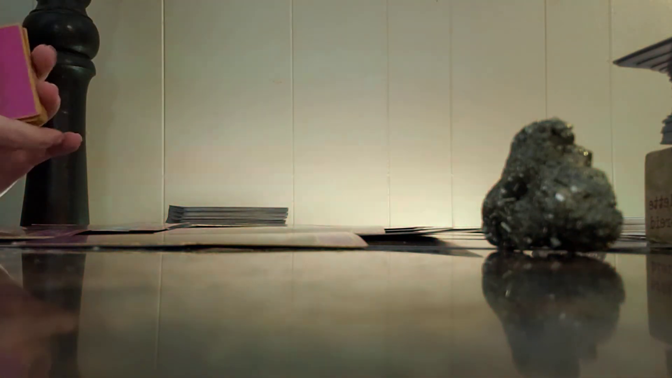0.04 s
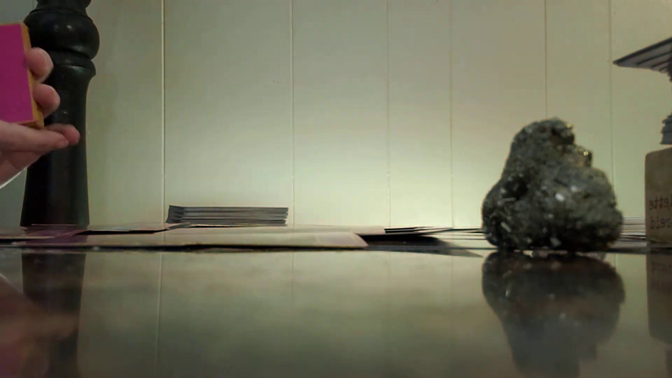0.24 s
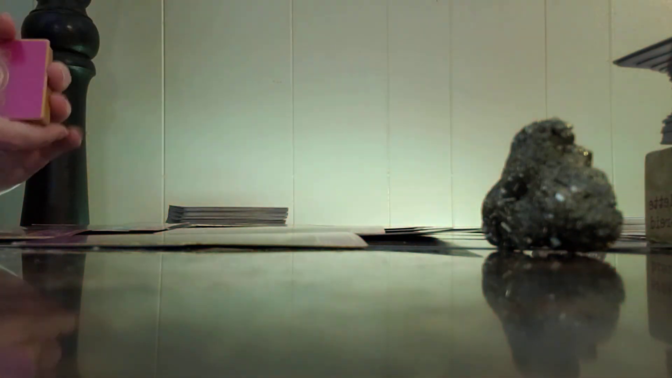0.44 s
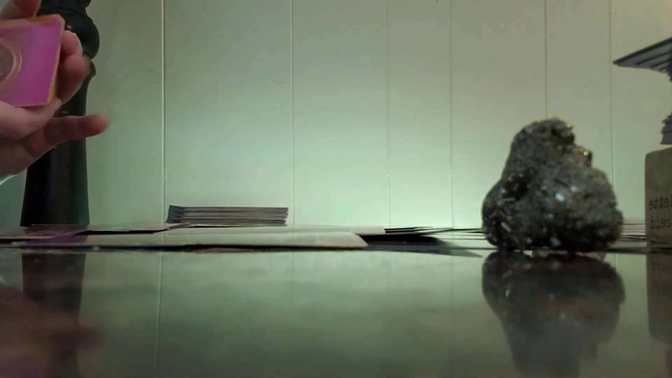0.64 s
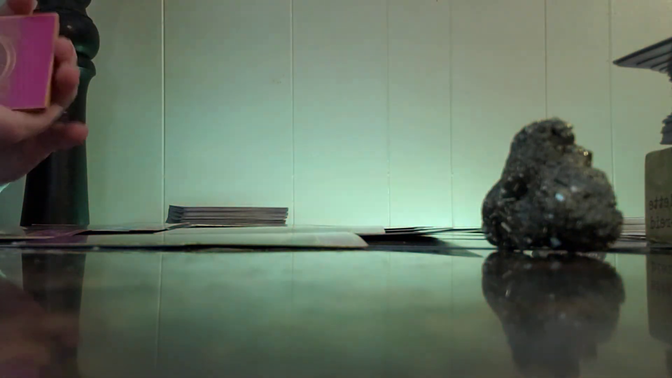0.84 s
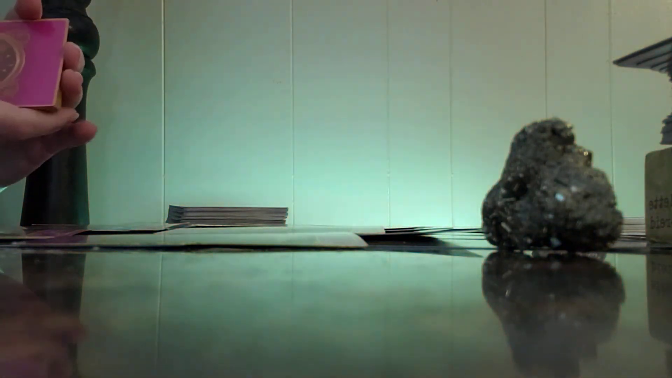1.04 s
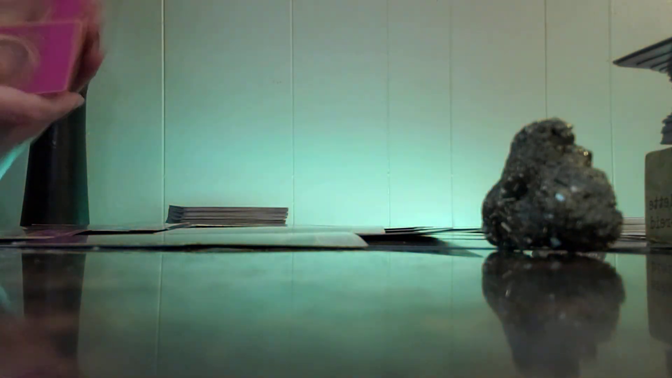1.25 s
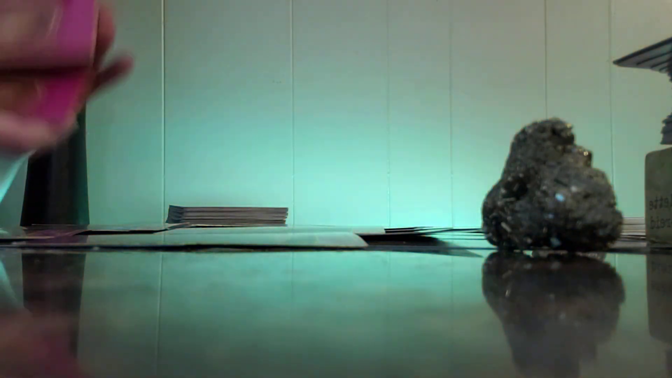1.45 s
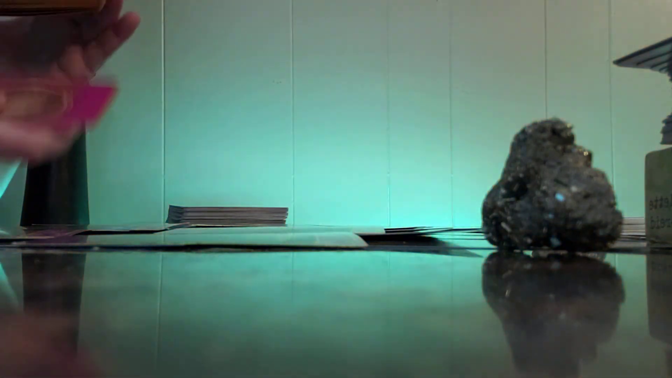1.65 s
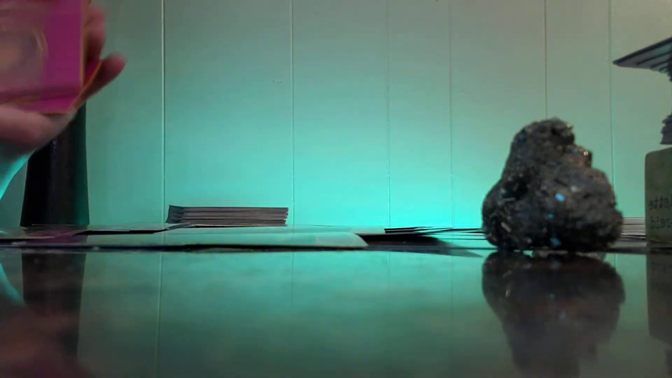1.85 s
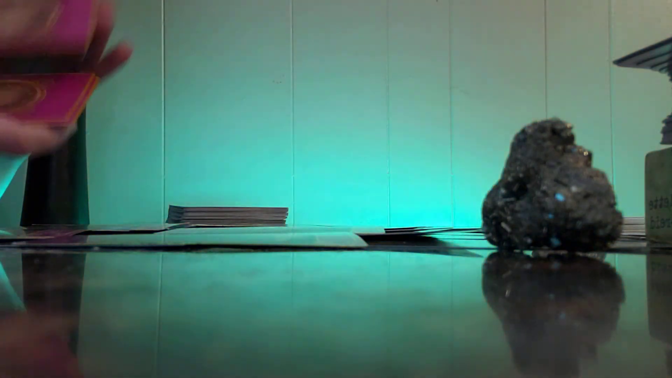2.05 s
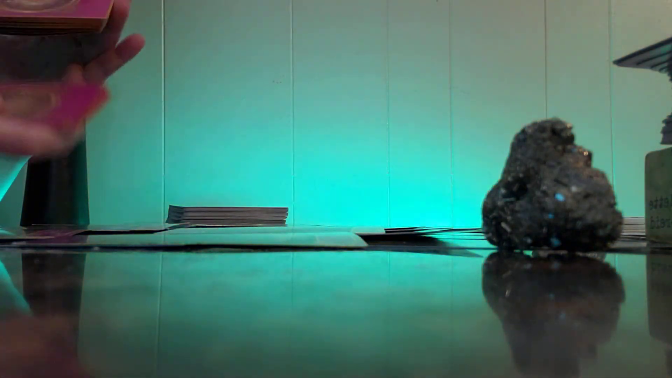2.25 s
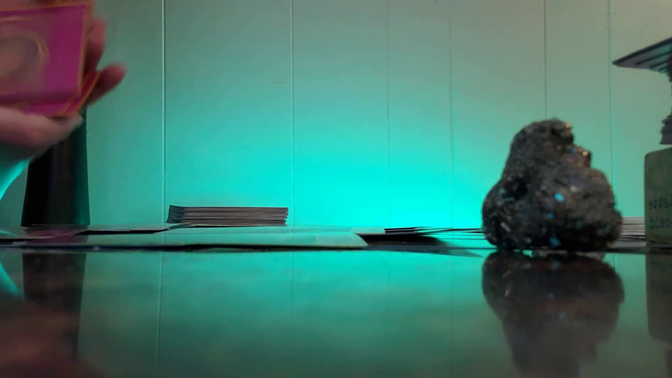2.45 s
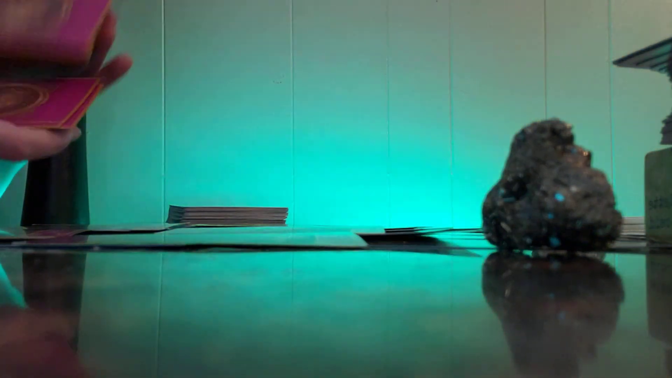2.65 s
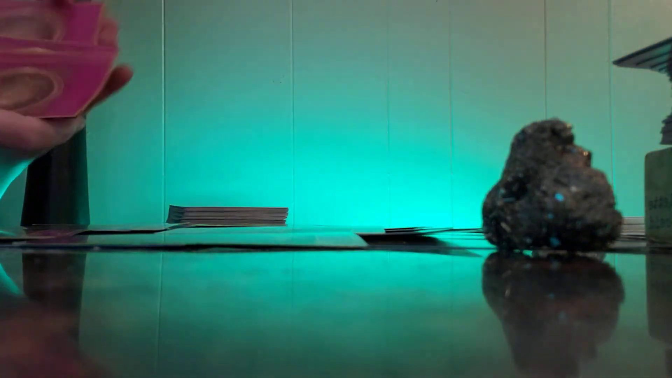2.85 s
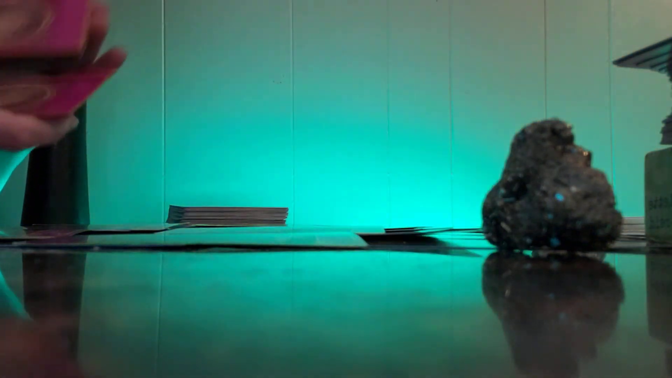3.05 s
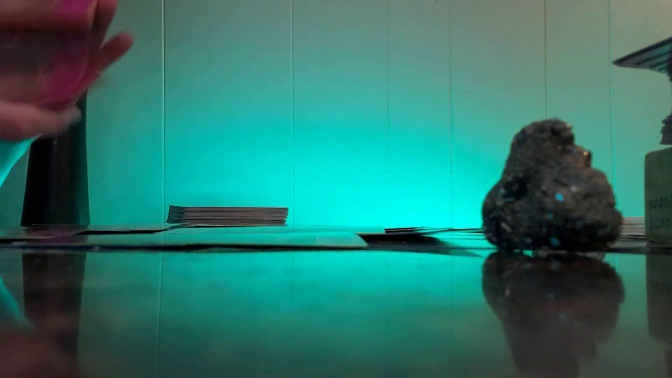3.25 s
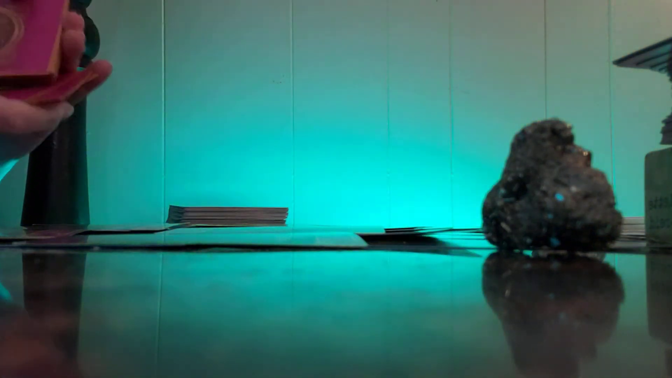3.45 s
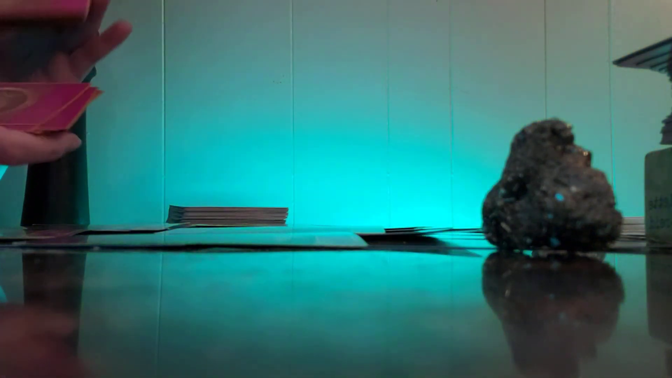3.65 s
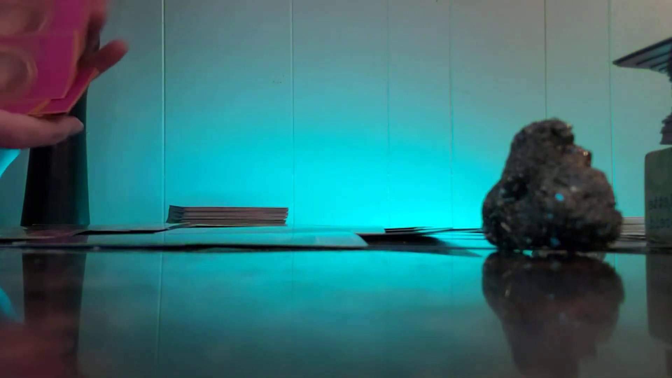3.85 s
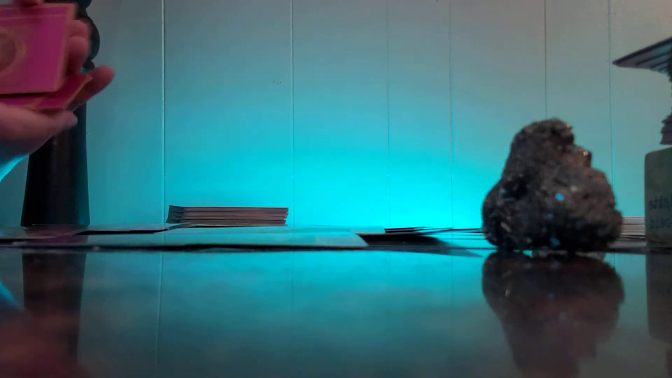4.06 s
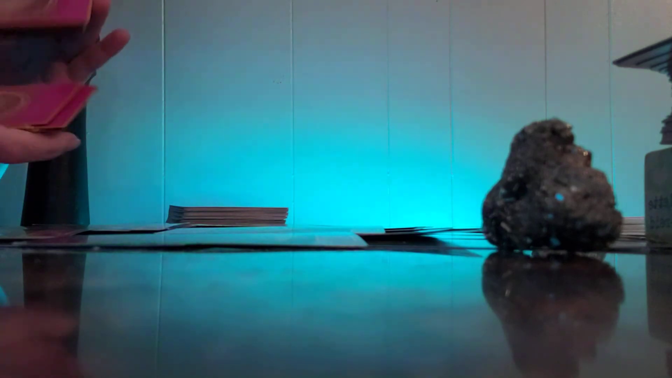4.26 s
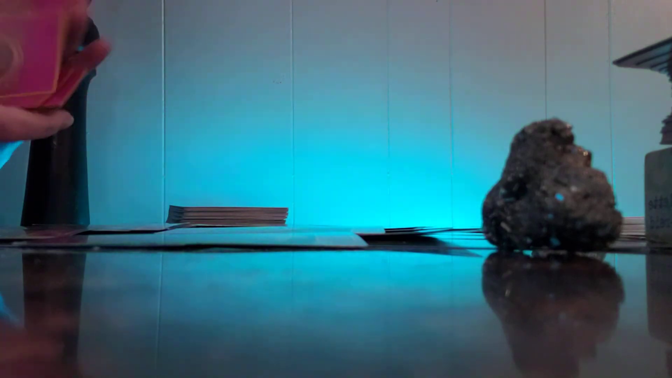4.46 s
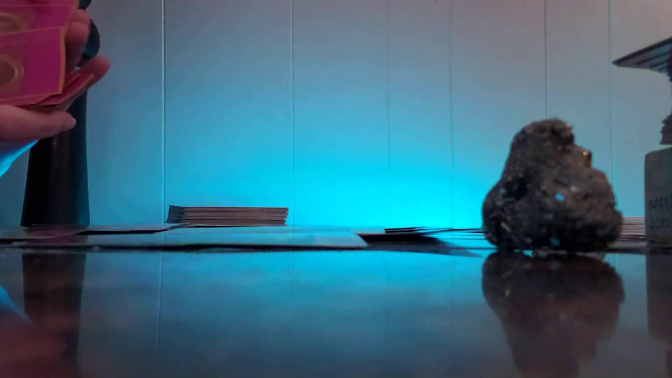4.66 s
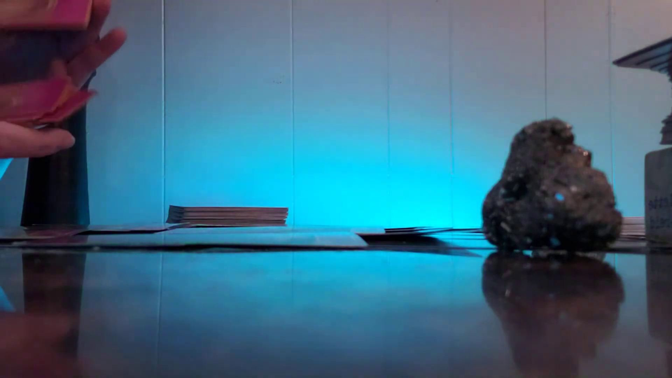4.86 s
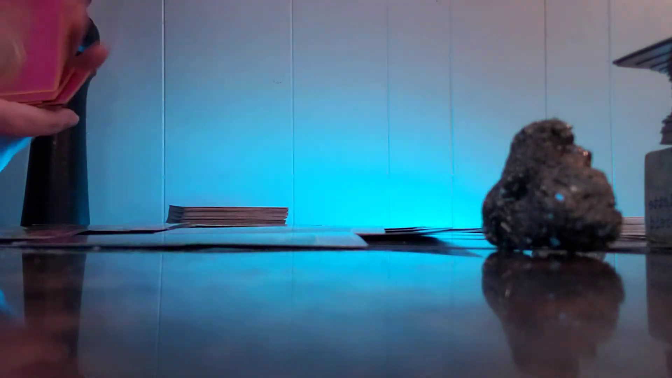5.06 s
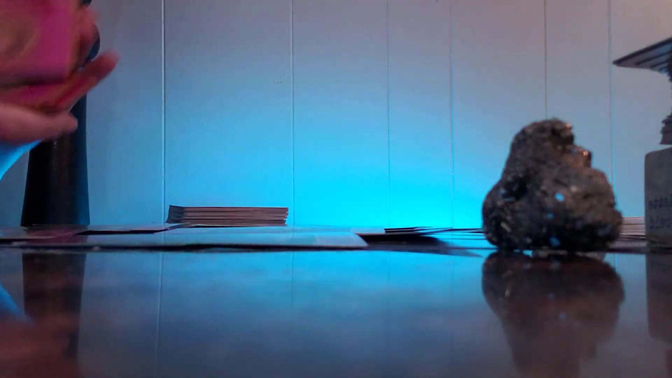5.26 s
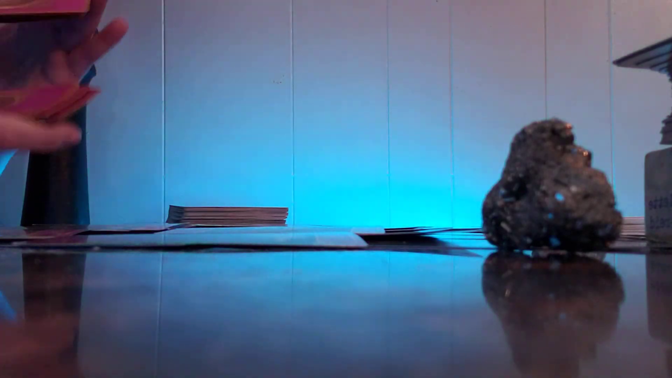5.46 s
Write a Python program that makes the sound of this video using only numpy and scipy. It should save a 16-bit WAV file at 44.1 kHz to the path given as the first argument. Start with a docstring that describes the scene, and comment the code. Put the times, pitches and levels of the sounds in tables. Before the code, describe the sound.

Overhand shuffling of a thick card deck, heard close and a little left of centre indoors. Just over a second of quiet rumble comes first, then ten regular slaps, a brief gap filled with sliding and light ticks, and three more slaps. Each has a brief hiss, bright snap, woody clack and hollow knock, followed by a short, hard room reverberation.

```python
"""A low rumble, a deep drone, faint hiss and a thin whine come first; then fingers scrape on card.
A deck of tarot cards is shuffled overhand, about three strokes a second, a little left of the microphones.
In each stroke a packet hisses over the deck, its edges snap, and it lands with a slap that squeezes out the air.
The hand answers with a soft thump and a knock of cupped air, and cards tick as the next packet is gripped.
Rubbing is shaped noise, contacts are coloured bursts, slaps are air pulses ringing the deck; a hard room replies."""
import sys
import numpy as np
from scipy import signal
from scipy.fft import rfft, irfft, next_fast_len
from scipy.io import wavfile
from scipy.ndimage import map_coordinates

SR = 44100
rng = np.random.default_rng(int(sys.argv[2]) if len(sys.argv) > 2 else 0)


def digitize_waveform(pressure):
    """Quantize a signal to 16-bit integers and store it at the path in sys.argv[1].

    Rows of a 2-D input are taken as channels; values are limited to [-1, 1].
    """
    field = np.atleast_2d(pressure).T
    bounded = np.clip(field, -1, 1)
    quanta = np.round(bounded * 32767).astype(np.int16)
    wavfile.write(sys.argv[1], SR, quanta)


N = 243431
TIME = np.arange(N) / SR

# Overhand strokes: the packet is drawn off, slides, lands on one edge, then falls flat into the palm.
# Each row: landing in seconds, slide length in seconds, fall time in seconds, then relative levels in dB of
# the draw, slide, landing push, landing clack and flat push, flat push length in milliseconds, flat snap in dB,
# flat clack in dB, card bending pitch in Hz, thump in dB, cupped air pitch in Hz, knock in dB.
STROKES = [ (1.3441, .020, .0045, -56, -29, -12, -26, -32, 0.7, -26.5, -17, 2320, -24, 732, -12.5),
           (1.6767, 0.023, 0.0071, -45, -28, -18.5, -25.5, -19.5, 1.54, -28, -32, 1680, -32, 1030, -24.5),
           (1.984, 0.024, 0.007, -49, -29.5, -21, -34, -29, 1.7, -19.5, -29.5, 2650, -34.5, 1100, -26.5),
           (2.294, 0.029, 0.0088, -53, -32.5, -28.5, -39, -26, 1.33, -22.5, -28, 990, -37, 880, -31),
           (2.6134, .028, 0.0041, -52, -28, -24, -27, -18, 0.5, -32, -19, 2380, -28.5, 1175, -20),
           (2.9861, 0.032, 0.0049, -49.5, -31, -21.5, -24, -26, 1.55, -36, -44, 2410, -34, 1140, -19),
           (3.3203, 0.039, 0.007, -55, -33.5, -20.5, -29.5, -26.5, 1.55, -32, -29.5, 1380, -27.5, 1470, -26),
           (3.6376, 0.022, 0.0086, -52, -31.5, -20.5, -40, -24.5, 1.16, -22, -26, 1280, -28.5, 1396, -21),
           (3.9552, .021, .0068, -47.5, -33, -11.5, -34, -30.5, 2.6, -39, -28, 1110, -24, 1070, -36),
           (4.2497, 0.015, .0060, -39, -30.5, -23.5, -28.5, -25, 0.54, -40, -49, 2860, -38, 840, -28),
           (4.8307, 0.042, .0038, -53.5, -32.5, -18.5, -24.5, -21.5, 0.77, -42, -33, 990, -30, 760, -21),
           (5.1794, .035, 0.0053, -43.5, -38.5, -27, -33, -14, 0.51, -29.5, -22, 2350, -23.5, 1090, -21),
           (5.483, 0.021, 0.0035, -46.5, -45, -8, -38, -28, 2.5, -29.5, -24, 1680, -28.5, 1140, -31)]


def amp(db):
    """Level as a logarithm: decibels to amplitude ratio."""
    return 10 ** (np.asarray(db) / 20)


def unit(x):
    """Normalisation by mean power: scale to rms 1."""
    return x / np.sqrt(np.mean(x ** 2) + 1e-20)


def along(points, hz):
    """Interpolation of (Hz, value) points on a logarithmic frequency axis."""
    f, v = np.transpose(points)
    return np.interp(np.log(hz + 1), np.log(f + 1), v)


def filtered(x, response):
    """Linear filtering: the spectrum is multiplied by a complex response of frequency."""
    size = x.shape[-1]
    padded = next_fast_len(size + SR // 4)
    hz = np.fft.rfftfreq(padded, 1 / SR)
    return irfft(rfft(x, padded) * response(hz), padded)[..., :size]


def noise(spectrum, size=N):
    """Coloured noise: white noise shaped by a spectrum, at rms 1."""
    white = rng.standard_normal(size)
    return unit(filtered(white, lambda hz: amp(along(spectrum, hz))))


def wobble(rate):
    """Slow random modulation: Gaussian knots, rate of them a second, joined by straight lines."""
    knots = rng.standard_normal(int(N * rate / SR) + 4)
    return map_coordinates(knots, [TIME * rate], order=1)


def add(track, s, sound):
    """Superposition: mix a sound into a track from time s in seconds."""
    i = max(round(s * SR), 0)
    track[i:i + len(sound)] += sound[:max(N - i, 0)]


def background(rumble_db=-44.0, hiss_db=-67, lean_db=0.32, swell_db=0.78, settle_db=-2, waver=.5):
    """Partly coherent stereo rumble, incoherent hiss, and a whine of sines with wandering phase."""
    # Spectra of low rumble and faint hiss. Each row: frequency in Hz, relative level in dB per Hz.
    rumble_spectrum, hiss_spectrum = [(15, -40), (25, -18), (33, -7), (46, 1), (62, -1.5), (130, -10),
                                      (160, -10.5), (220, -10.5), (420, -14.5), (950, -18), (2300, -30.5),
                                      (3600, -45), (5500, -55), (16000, -53)], [(2000, -2), (5600, -7), (7800, 1), (9500, -3),
                                                      (12000, 5.5), (13800, 10), (15500, 0), (17000, -33.5)]
    # Left-right coherence of the rumble. Each row: frequency in Hz, correlation from 0 to 1.
    coherence = [(60, 0.83), (200, 0.89), (400, 0.74), (950, 0), (2400, 0), (15000, 0.54)]
    # Lines of the thin whine. Each row: frequency in Hz, rms level in dB.
    whine_lines = [(14729, -68), (15106, -76), (15477, -78)]

    def angle(hz):
        # cos^2 - sin^2 of this angle is the left-right correlation
        return np.arccos(np.clip(along(coherence, hz), -1, 1)) / 2

    mid = filtered(noise(rumble_spectrum), lambda hz: np.cos(angle(hz)))
    side = filtered(noise(rumble_spectrum), lambda hz: np.sin(angle(hz)))
    level_db = rumble_db + swell_db * wobble(8.1) + settle_db * TIME / TIME[-1]
    rumble = amp(level_db) * np.array([mid + side, mid - side]) * amp([[lean_db], [-lean_db]])
    hiss = amp(hiss_db) * np.array([noise(hiss_spectrum), noise(hiss_spectrum)])
    whine = 0
    for hz, db in whine_lines:
        phase = 2 * np.pi * hz * TIME + waver * wobble(40)
        whine = whine + amp(db) * np.sqrt(2) * np.sin(phase)
    return rumble + hiss + whine


def hum(drift=.012, swell_db=3.5):
    """Phase modulation in proportion to frequency: a deep drone whose upper lines waver more."""
    # A distant machine. Each row: frequency in Hz, middle level in dB before the stereo balance.
    lines = [(37, -51.5), (184, -61), (229, -58.5)]
    drone = 0
    for hz, db in lines:
        level = amp(db + swell_db * wobble(3.03)) * np.sqrt(2)
        drone = drone + level * np.sin(2 * np.pi * hz * TIME + drift * hz * wobble(10))
    return drone


def scrapes(width=0.59, grain_db=4):
    """Stick-slip friction: skin drags on a card, which sounds in one broad bending resonance."""
    # Fingers dragging on card. Each row: middle in seconds, time from the middle to 1/e amplitude in seconds,
    # resonance in Hz, relative level in dB.
    drags = [(.69, 0.014, 2470, -63), (0.772, .005, 13500, -58), (.875, 0.016, 12100, -59.5),
             (2.77, 0.0057, 2470, -44), (2.853, 0.016, 2270, -50.5), (4.204, 0.022, 3070, -47.5),
             (4.709, .015, 2220, -59), (4.943, 0.02, 2690, -64), (5.142, 0.035, 2000, -63)]
    out, t = np.zeros(N), np.arange(SR // 5) / SR
    middle = t.mean()
    for s, half, hz, db in drags:
        def resonance(f):
            damping = 1j * f * hz * width
            return (damping / (hz * hz - f * f + damping)) ** 2

        ring = unit(filtered(rng.standard_normal(len(t)), resonance))
        envelope = np.exp(-((t - middle) / half) ** 2)
        add(out, s - middle, amp(db) * envelope * ring)
    return out * unit(amp(grain_db * wobble(300)))


def swell(start, fastest, stop, db, rise_db, edge_s=0.0047, slowing_db=4):
    """Friction noise grows with speed: the level of one move that sets in, speeds up, slows and stops."""
    times = np.sort([start - edge_s, start, fastest, stop, stop + edge_s])
    levels_db = [-rise_db - 28, -rise_db, 0, -slowing_db, -24]
    return amp(db + np.interp(TIME, times, levels_db, -200, -200))


def slides(grain_db=4.0, grain_rate=700, gain_db=-1):
    """Sliding friction: a grainy hiss swells with speed and stops just after the packet falls flat."""
    # Spectrum of card rubbing on card. Each row: frequency in Hz, relative level in dB per Hz.
    rub = [(200, -49), (900, -12.5), (2500, -14.5), (4200, -9.5), (6000, -20.5), (8000, -7.5),
           (10000, -2.5), (12000, 3), (13800, -3.5), (15500, 4), (17000, -42)]
    # Cards shifting in the grip. Each row: fastest moment in seconds, length of the rise to it in seconds,
    # relative level in dB.
    shifts = [(1.543, .008, -46), (2.85, .015, -43), (4.583, 0.063, -39.5), (4.647, 0.023, -49),
              (5.036, 0.028, -48.5)]
    draw_s, draw_rise_db = 0.084, 11.5  # the slow draw before each slide, and how much it swells
    slide_rise_db, fastest_share = 9, 0.7  # a slide swells to its top this far along its way
    overrun_s = 0.0047  # cards skid on after falling flat
    shift_rise_db, shift_stop_s = 18, 0.017  # how much a shift swells, and how soon it stops
    envelope = np.zeros(N)
    for s, length, fall, draw_db, slide_db, *_ in STROKES:
        start = s - length
        fastest, stop = start + fastest_share * length, s + fall + overrun_s
        envelope += swell(start - draw_s, start - .005, start, draw_db, draw_rise_db)
        envelope += swell(start, fastest, stop, slide_db, slide_rise_db)
    for s, length, db in shifts:
        envelope += swell(s - length, s, s + shift_stop_s, db, shift_rise_db)
    grainy = unit(noise(rub) * amp(grain_db * wobble(grain_rate)))
    return amp(gain_db) * envelope * grainy


def contacts():
    """Impact sequence: every touch of a card edge as (seconds, snap dB, clack dB, bending Hz)."""
    # Fingers gripping the next packet. Each row: time in seconds, relative clack level in dB,
    # relative snap level in dB.
    ticks = [(1.5371, -30.5, -35.5), (1.6268, -38, -41), (1.8438, -36.5, -45), (2.157, -38, -47.5),
             (2.2296, -38.5, -49), (2.442, -34.5, -42.5), (2.5282, -35, -56), (2.7579, -41, -44),
             (2.8324, -34, -33.5), (3.254, -31, -41), (3.5017, -44, -46), (3.5774, -31.5, -46),
             (3.8746, -37, -41), (4.1081, -38, -52), (4.1679, -29, -38.5), (4.412, -38, -51),
             (4.4915, -37, -48), (4.5158, -40.5, -44), (4.7222, -38, -50), (5.0114, -35, -47),
             (5.0883, -29.5, -45), (5.3432, -36.5, -48)]
    # snaps relative to the slide's hiss: setting off, in mid slide, at the landing
    catch_db, flick_db, touch_db = -6, 1.5, -3.5
    light_clack_db = -47  # clack under the snap of a lone card
    straggler_s, straggler_db = .009, -4.5  # a last card follows the packet down
    tick_hz, tick_spread = 1870, 0.3  # bending pitch of a gripped card, and its scatter (natural log)
    tick_clack_db = -5.5
    for s, length, fall, _, slide_db, _, clack_db, _, _, flat_snap_db, flat_clack_db, hz, *_ in STROKES:
        yield s - length, slide_db + catch_db, light_clack_db, hz
        yield s - length * rng.uniform(0.32, .7), slide_db + flick_db, light_clack_db, hz
        yield s, slide_db + touch_db, clack_db, hz
        yield s + fall, flat_snap_db, flat_clack_db, hz
        yield s + fall + straggler_s, flat_snap_db + straggler_db, light_clack_db, hz
    for s, clack_db, snap_db in ticks:
        hz = tick_hz * np.exp(tick_spread * rng.standard_normal())
        yield s, snap_db, clack_db + tick_clack_db, hz


def burst(colour, decay, rattle_db, rattle_decay):
    """Impact transient: one contact, 3 ms in, with the decaying chatter of neighbouring cards."""
    t = np.maximum(np.arange(2048) / SR - .003, 0)
    onset = 1 - np.exp(-t / .0001)
    shape = onset * (np.exp(-t / decay) + amp(rattle_db) * np.exp(-t / rattle_decay))
    phase = np.angle(rfft(rng.standard_normal(len(t)) * shape))  # random fine timing, even colour
    magnitude = amp(colour(np.fft.rfftfreq(len(t), 1 / SR)))
    sound = irfft(magnitude * np.exp(1j * phase))
    return sound / np.linalg.norm(sound) * np.sqrt(.003 * SR)  # rms 1 if spread over 3 ms


def edges(clack_gain_db=-1.0, bend_db=7, bend_width=0.2):
    """Bending resonance: an edge gives a bright snap and a duller clack, coloured by the card's free length."""
    # Spectra of the snap and the clack. Each row: frequency in Hz, relative level in dB per Hz.
    snap_spectrum, clack_spectrum = [(1500, -57), (4000, -30), (6000, -19), (9500, -1.5), (12000, 1.5),
                                     (14000, 2.5), (15500, 4.5), (17000, -28)], [(150, 5.5), (550, -2.5), (1100, 1.5), (1700, -3),
                                                   (2500, -8), (3300, 1), (4500, -15.5), (7000, -20),
                                                   (14000, -10)]
    out = np.zeros(N)
    for s, snap_db, clack_db, hz in contacts():
        def bright(f):
            return along(snap_spectrum, f)

        def stiff(f):
            return along(clack_spectrum, f) + bend_db / (1 + ((f / hz - 1) / bend_width) ** 2)

        start = s - .003  # the burst makes contact 3 ms in
        # hard snaps are the briefest, light ones smear
        decay = np.interp(snap_db, [-52, -38, -22], [.004, .0013, .0004])
        snap = burst(bright, decay=decay, rattle_db=-23, rattle_decay=0.0049)
        clack = burst(stiff, decay=0.0024, rattle_db=-13, rattle_decay=0.0048)
        add(out, start, amp(snap_db) * snap)
        add(out, start, amp(clack_db + clack_gain_db) * clack)
    return out


def slaps(ring_db=2, first_push_ms=0.64):
    """Air displacement: trapped air gives a push and rebound at both contacts, and excites the deck's modes."""
    # Modes of the deck in the hand. Each row: frequency in Hz, bandwidth in Hz, relative level in dB.
    modes = [(428, 15, -15), (735, 65, 5.5), (1047, 104, 1.5), (1149, 27, 6), (1740, 43, -13),
             (2270, 290, 1.5), (2560, 140, -17)]
    push, ms = np.zeros(N), np.arange(SR // 25) / SR * 1000
    for s, _, fall, _, _, landing_db, _, flat_db, flat_ms, *_ in STROKES:
        for when, db, length in [(s, landing_db, first_push_ms), (s + fall, flat_db, flat_ms)]:
            u = 3 * ms / length  # the push turns into the rebound at u = 3
            pulse = u * u * (3 - u) * np.exp(-u) / .78  # peak near 1
            add(push, when, -amp(db) * pulse)

    def deck(f):
        total = 0
        for k, (centre, width, db) in enumerate(modes):
            damping = 1j * f * width
            sign = (-1) ** k  # neighbouring modes in opposite phase
            total = total + sign * amp(db) * damping / (centre * centre - f * f + damping)
        return total

    return push + amp(ring_db) * filtered(push, deck)


def palm(thump_hz=95, thump_t60=0.029, thump_attack=0.0025, knock_t60=0.019, knock_attack=0.00046):
    """Damped resonance: the hand yields in a soft thump, and cupped air knocks at a pitch set by the grip."""
    out, t = np.zeros(N), np.arange(SR // 10) / SR

    def ring(t60, attack):
        return amp(-60 * t / t60) * (1 - np.exp(-t / attack))

    for s, _, fall, *_, thump_db, hz, knock_db in STROKES:
        thump = ring(thump_t60, thump_attack) * np.cos(2 * np.pi * thump_hz * t)
        knock = ring(knock_t60, knock_attack) * np.sin(2 * np.pi * hz * t)
        add(out, s + fall, -4 * amp(thump_db) * thump)
        add(out, s + fall, amp(knock_db) * knock)
    return out


def at_microphones(x, lag=0.0001626, spread=0.0017, scatter_db=-6):
    """Time and level differences: the left port hears the cards first; the table scatters into each port."""
    # Stereo balance of the cards. Each row: frequency in Hz, left minus right level in dB.
    lean = [(80, 5.5), (300, 2), (600, 4), (1200, 5), (2300, -19.5), (4200, 5.5), (8000, 9), (13000, 6)]
    side = np.array([[1], [-1]])
    t = np.arange(256) / SR
    table = rng.standard_normal((2, len(t))) * np.exp(-t / spread)
    table = table / np.linalg.norm(table, axis=1, keepdims=True)
    scattered = signal.fftconvolve(x[None], table, axes=1)[:, :N]
    scattered = filtered(scattered, lambda hz: 1j * hz / (4000 + 1j * hz))  # high-pass at 4 kHz

    def direct_path(hz):
        return amp(side * along(lean, hz) / 2) * np.exp(1j * np.pi * hz * lag * side)

    return filtered(x, direct_path) + amp(scatter_db) * scattered


def room(x, wet_db=-7, wall_db=-11, wall_delay=.0093, build=0.0014):
    """Reflection and reverberation: a near wall, then a diffuse tail drawn afresh for 16 equal pieces of time."""
    # Colour of the reflecting walls. Each row: frequency in Hz, relative level in dB.
    walls = [(40, -29), (150, -14), (400, -2.5), (900, 2.5), (1500, -0.5), (2300, 2), (3200, -7),
             (5000, 2.5), (8000, -3), (12000, -5), (16000, -2)]
    # Reverberation time. Each row: frequency in Hz, time to decay by 60 dB in seconds.
    reverberation = [(150, 0.39), (1000, 0.39), (3000, 0.42), (8000, 0.42), (15000, 0.25)]

    def near_wall(hz):
        return amp(wall_db + along(walls, hz)) * np.exp(-2j * np.pi * hz * wall_delay)

    out = filtered(np.array([x, x]), near_wall)
    for piece in np.array_split(np.arange(N), 16):
        hz, t, z = signal.stft(rng.standard_normal((2, SR // 2)), SR, nperseg=256)
        z = z * amp(-60 * t / along(reverberation, hz)[:, None]) * (1 - np.exp(-t / build))
        tail = signal.istft(z * amp(along(walls, hz))[:, None], SR, nperseg=256)[1]
        for channel, response in zip(out, tail):
            response = response / np.linalg.norm(response)
            add(channel, piece[0] / SR, amp(wet_db) * signal.fftconvolve(x[piece], response))
    return out


def scene():
    """Superposition of the cards, their room and the background; the drone leans left."""
    cards = slides() + edges() + slaps() + palm() + scrapes()
    drone = hum() * amp([[1.5], [-1.5]])
    return at_microphones(cards) + room(cards) + background() + drone


def record(dry, low_cut_hz=32, top_hz=16100):
    """Band limiting: a high-pass thins the deepest bass and a very steep low-pass closes the treble."""
    high_pass = signal.butter(6, low_cut_hz, "highpass", fs=SR, output="sos")
    thinned = signal.sosfilt(high_pass, dry)
    return filtered(thinned, lambda hz: 1 / np.sqrt(1 + (hz / top_hz) ** 300))


dry = scene()
out = record(dry)
digitize_waveform(out)
```